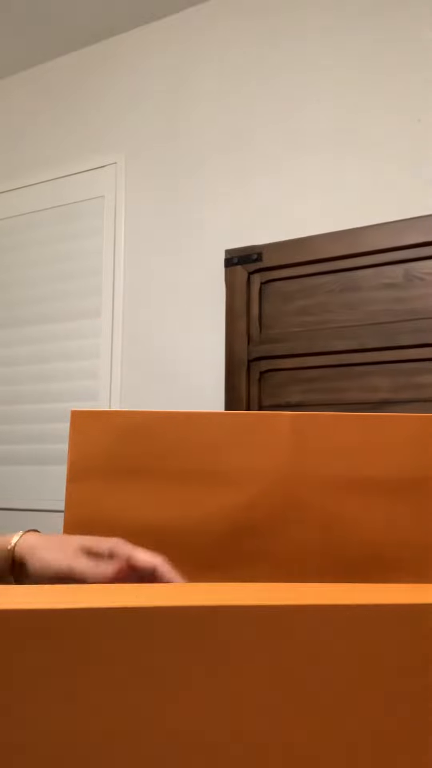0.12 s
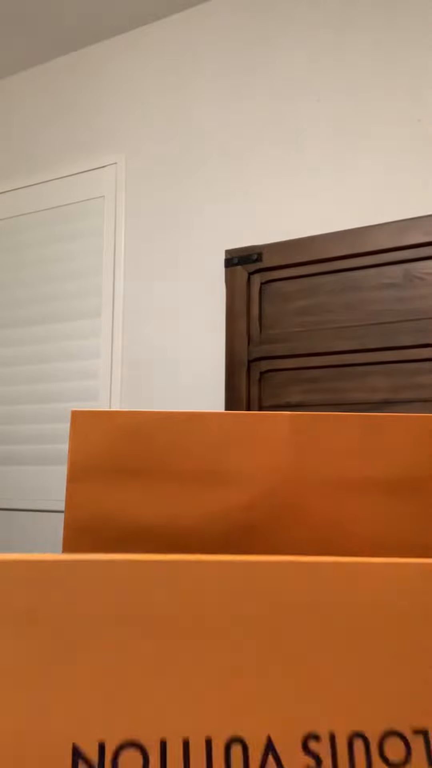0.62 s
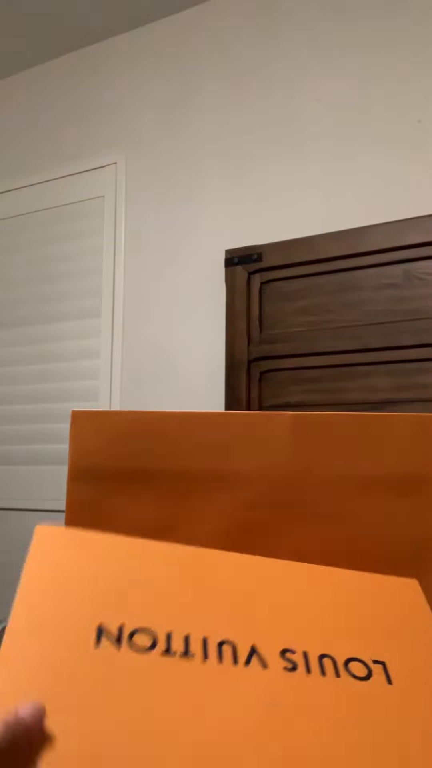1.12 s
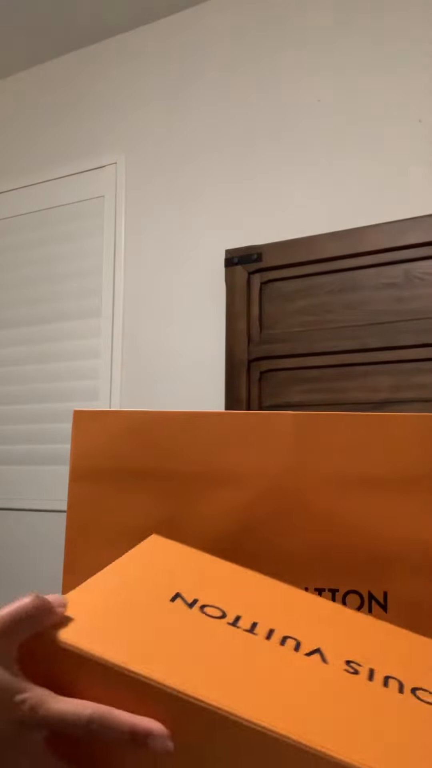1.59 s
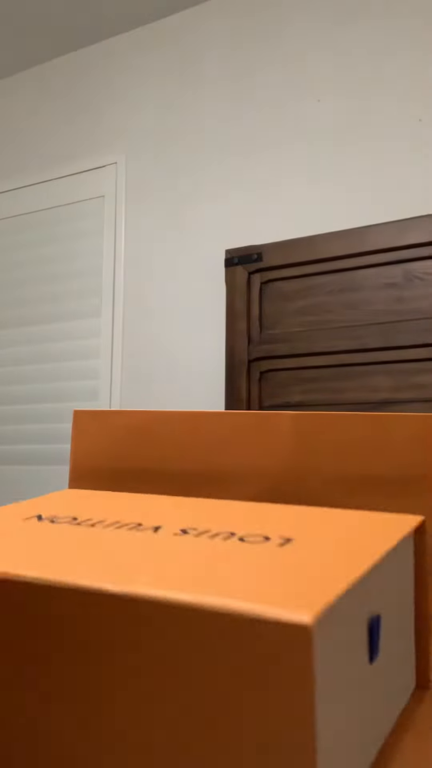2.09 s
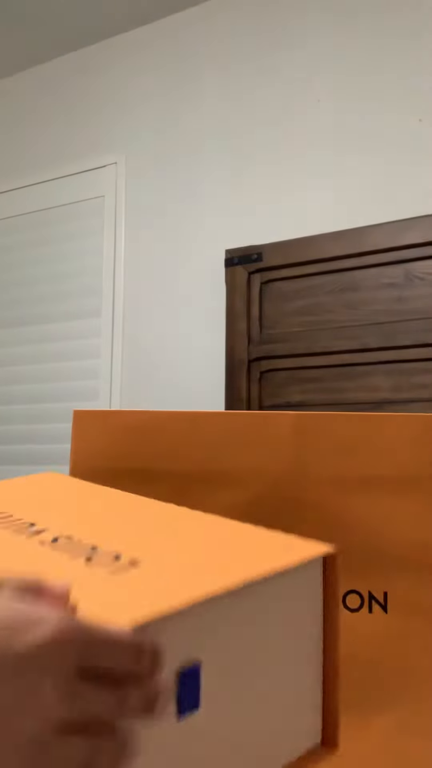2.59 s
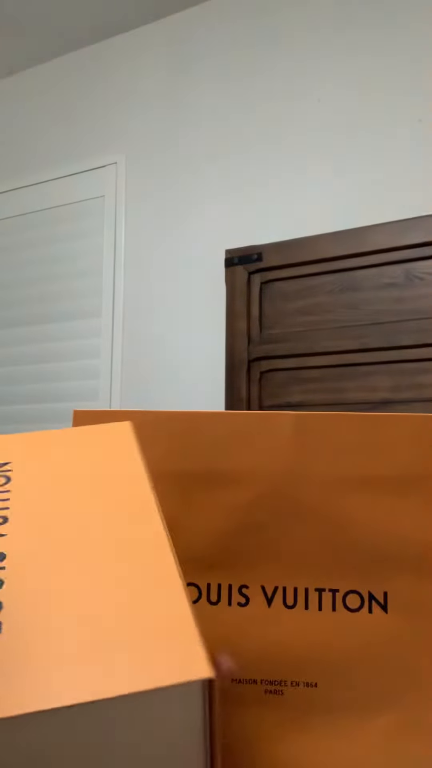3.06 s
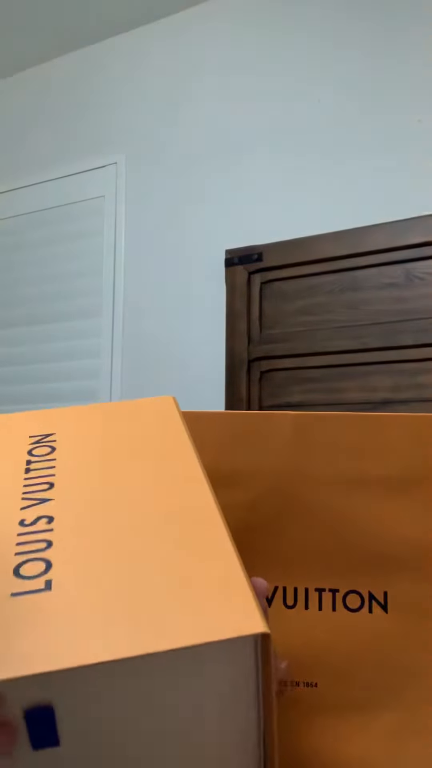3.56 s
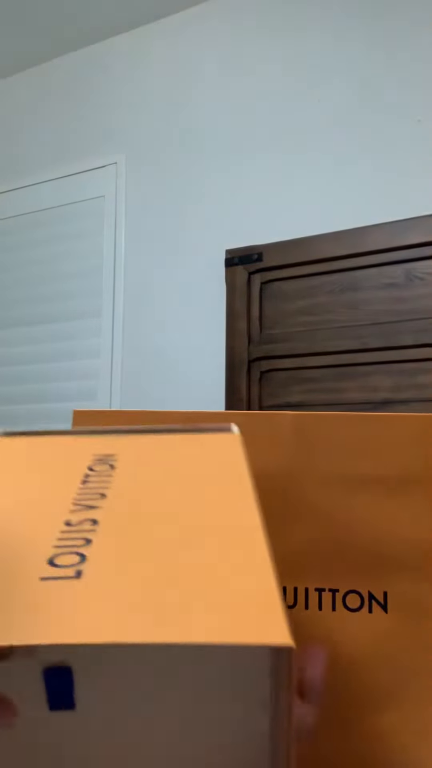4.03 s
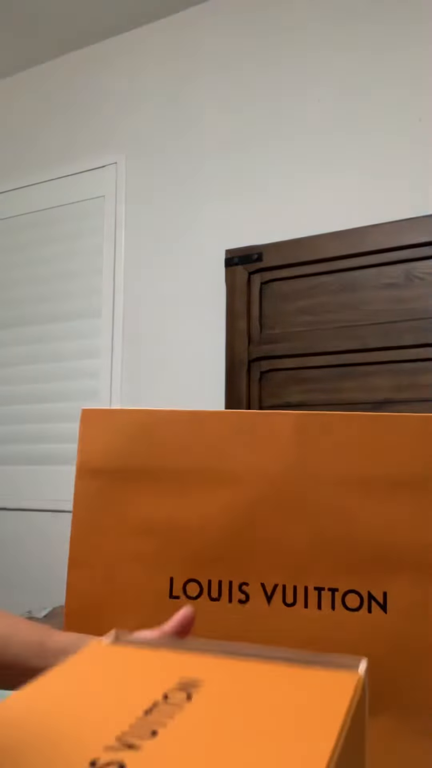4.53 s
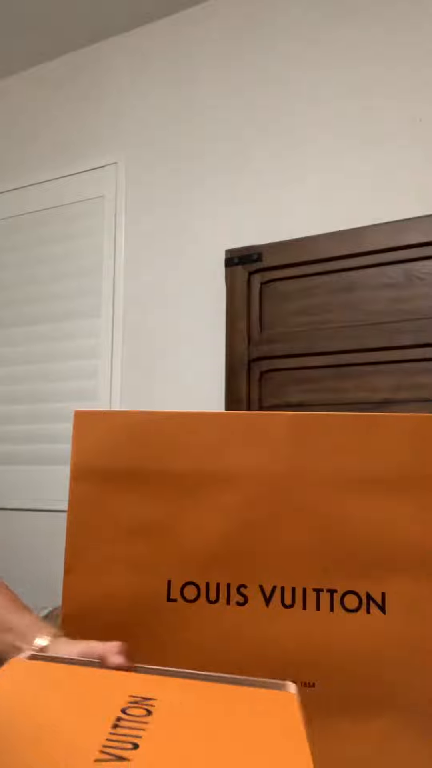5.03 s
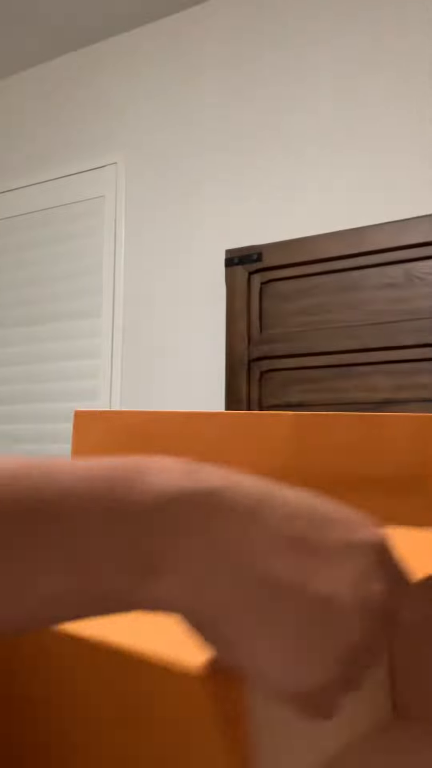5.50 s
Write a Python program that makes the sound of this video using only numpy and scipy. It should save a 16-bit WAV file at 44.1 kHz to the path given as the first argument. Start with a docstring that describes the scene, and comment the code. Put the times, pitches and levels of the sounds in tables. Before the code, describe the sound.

Hands turn a stiff, coated cardboard box near the microphone, with one strong scraping bump early, then scattered knocks, finger hiss and a busy rustling finish.

```python
"""Cardboard box in two hands

A hollow cardboard box is turned over close to a phone in a quiet room. Fingers hiss over the coated
paper as dense stick-slip; edges scrape and creak as coarser slips that ring the walls. Knocks excite
decaying modes of hollow and walls, palms make it boom, taps and snaps click, a bracelet tinks once.
The phone's two ports hear the treble a fixed moment apart, the lower range with a drifting lag."""
import sys
import numpy as np
from scipy import signal
from scipy.fft import rfft, irfft
from scipy.io import wavfile
from scipy.ndimage import uniform_filter1d, map_coordinates

SR = 44100
rng = np.random.default_rng(int(sys.argv[2]) if len(sys.argv) > 2 else 0)


def wav_record(signal):
    """Record a signal, one row per channel, as 16-bit PCM in the file named by sys.argv[1]."""
    frames = np.transpose(np.atleast_2d(signal))
    bounded = np.clip(frames, -1, 1)
    # unit amplitude maps onto the largest positive 16-bit level
    quanta = np.round(bounded * 32767).astype(np.int16)
    wavfile.write(sys.argv[1], SR, quanta)


def volts(x):
    """Linear amplitude factor 10**(x/20) for a level x in dB, scalar or array-like."""
    e = np.asarray(x, float) / 20
    return 10 ** e


N = 248825
T = np.arange(N) / SR
TREBLE_LAG = 5  # samples by which the left port hears the treble later


def unit(x):
    """Normalisation to unit rms."""
    return x / np.sqrt(np.mean(x ** 2))


def peak(x, level_db):
    """Normalisation of the largest excursion to a peak level in dB."""
    return x * volts(level_db) / np.abs(x).max()


def colour(x, points):
    """Spectral shaping: filter by a (Hz, dB) curve that falls away beyond its ends; rms 1."""
    hz, db = np.transpose(points)
    log_hz = np.log(np.arange(1, N // 2 + 2) * SR / N)
    below = np.maximum(np.log(hz[0]) - log_hz, 0)
    above = np.maximum(log_hz - np.log(hz[-1]), 0)
    gain_db = np.interp(log_hz, np.log(hz), db) - 20 * (below + above)
    return unit(irfft(rfft(x) * volts(gain_db), N))


def walk(rate):
    """Random modulation: levels drawn rate times a second and slewed between; spread near 1."""
    hold = int(SR / rate)
    steps = np.repeat(rng.standard_normal(N // hold + 1), hold)
    return unit(uniform_filter1d(steps, hold)[:N])


def slips(rate, spread_db):
    """Stick-slip friction: about rate tiny releases a second, most small and a few large."""
    chance, sign, size = rng.random((3, N))
    heights = volts(-spread_db * np.log(1 - .95 * size))
    return unit((chance < rate / SR) * np.sign(sign - .5) * heights)


def patchy(x, patchy_db, rate, octaves):
    """Patchy noise: overlapping bands, octaves apart, swell and sink independently at random."""
    octave = np.log2(np.arange(1, N // 2 + 2) * SR / N)
    spectrum = rfft(x)
    total = np.zeros(N)
    for centre in np.arange(7, 14.5, octaves):
        band = irfft(spectrum * np.clip(1 - np.abs(octave - centre) / octaves, 0, 1), N)
        total += band * volts(patchy_db * walk(rate))
    return unit(total)


def gesture(start, end, first_db, last_db, rise, fall):
    """Exponential envelopes, a row per gesture: rise and fall in dB/s around a course linear in dB."""
    start, end, first_db, last_db = (np.reshape(c, (-1, 1)) for c in (start, end, first_db, last_db))
    along = np.clip((T - start) / np.maximum(end - start, 1 / SR), 0, 1)
    edges = rise * np.maximum(start - T, 0) + fall * np.maximum(T - end, 0)
    return volts(first_db + (last_db - first_db) * along - edges)


def ring(modes, seconds):
    """Modal superposition: a sum of exponentially decaying sines (Hz, dB, t60 s)."""
    t = np.arange(int(seconds * SR)) / SR
    decay = -np.log(1000) * t
    return sum(volts(db) * np.sin(2 * np.pi * hz * t) * np.exp(decay / t60) for hz, db, t60 in modes)


def detuned_walls(level_scale=1, ring_scale=1):
    """Boundary loading: the grip retunes each wall mode at random, by 6 % rms."""
    detune = 1 + .06 * rng.standard_normal(len(WALL_MODES))
    return [(hz * d, db * level_scale, t60 * ring_scale) for (hz, db, t60), d in zip(WALL_MODES, detune)]


def add(out, sound, start_s):
    """Linear superposition of a sound from its starting time."""
    i = int(start_s * SR)
    out[i:i + len(sound)] += sound[:N - i]


def lagged(x, lag):
    """Time difference between two ports: left and right, the left later by lag samples."""
    i = np.arange(N)
    return np.array([map_coordinates(x, [i - lag / 2], order=3), map_coordinates(x, [i + lag / 2], order=3)])


# spectrum of the room air: hz [Hz], level_db [relative dB]
ROOM_SPECTRUM = [(35, -6.5), (80, -3), (400, -26), (2500, -42), (9000, -43)]


def room():
    """Stationary noise: faint steady air, partly unlike at the two ports above the bass."""
    common_db = -68
    mid = colour(rng.standard_normal(N), ROOM_SPECTRUM)
    side = colour(rng.standard_normal(N), ROOM_SPECTRUM)
    side = signal.sosfilt(signal.butter(1, 900, "high", fs=SR, output="sos"), side)
    return volts(common_db) * (lagged(mid, TREBLE_LAG) + 2.7 * side * np.array([[1], [-1]]))


# modes of the box walls: hz [Hz], level_db [relative dB], t60_s [s]
WALL_MODES = [(470, -1, .045), (575, -1, .04), (700, -1, .04), (830, -3, .035), (1020, -6, .03),
              (1260, -6, .03), (1500, -11, .025), (1750, -12, .022), (2000, -14, .02), (2600, -20, .015)]
# slides of the board against the grip:
# start_s [s], end_s [s], scrape_db [dB], creak_db [dB], change_db [dB along the slide]
SLIDES = [(0.072, 0.108, -71, -64.5, -5.5), (0.302, 0.558, -64, -61, -9.5),
          (0.624, 0.692, -68.5, -70, 16.5), (0.824, 0.971, -39, -36, -18.5),
          (1.043, 1.155, -60, -57.5, 4.5), (1.229, 1.62, -63.5, -59.5, -10), (1.706, 1.835, -59, -52.5, 1),
          (1.842, 2.05, -68, -63, -4.5), (2.156, 2.196, -86, -57.5, 0), (2.53, 2.63, -77, -55, -4),
          (2.627, 2.812, -69, -68, 7.5), (2.853, 2.958, -58.5, -54, -6), (2.985, 3.384, -68, -62.5, 3),
          (3.48, 3.624, -59.5, -59, 5.5), (3.66, 3.814, -45.5, -58.5, 4.5), (3.857, 3.933, -58.5, -52, 0.5),
          (3.96, 4.21, -71, -81.5, 12.5), (4.225, 4.37, -45.5, -41.5, -9), (4.417, 4.672, -52.5, -47.5, 1),
          (4.758, 4.997, -64.5, -66, 0.5), (5.125, 5.168, -48.5, -50, -10.5), (5.191, 5.34, -59, -57.5, 1),
          (5.356, 5.637, -52, -58, 3.5)]
# spectra of edge scrape, bright rasp and wall creak: hz [Hz], level_db [relative dB]
SCRAPE_SPECTRUM = [(300, -2.5), (650, 9.5), (1300, -3.5), (2200, -9.5), (4000, -12.5)]
RASP_SPECTRUM = [(800, -15), (1500, 9), (3200, -23.5)]
CREAK_SPECTRUM = [(80, -26), (160, 1.5), (280, 7.5), (450, -13.5), (900, -18)]


def sliding():
    """Stick-slip excitation of a plate: edges and creases slip coarsely and ring the walls."""
    start, end, scrape_db, creak_db, change_db = np.transpose(SLIDES)
    slide = gesture(start, end, 0 * change_db, change_db, rise=795, fall=256.5)
    judder = walk(45)  # the board catches and lets go, shaking scrape and creak together
    walls = ring(WALL_MODES, .1)

    grain = patchy(slips(2500, 2.8), patchy_db=3, rate=13, octaves=.3)
    scrape_ring = unit(signal.fftconvolve(grain, walls)[:N])
    scrape = colour(grain, SCRAPE_SPECTRUM) + volts(-24) * scrape_ring
    scrape = scrape * (volts(scrape_db) @ slide) * volts(2.5 * judder)

    # a slide that scrapes more than it creaks is brighter, by 0.87 dB per dB
    rasp_db = scrape_db - 14 + 0.87 * (scrape_db - creak_db)
    rasp = colour(grain, RASP_SPECTRUM) * (volts(rasp_db) @ slide)

    # creases give way in separate small jerks that tick through the walls
    jerks = slips(450, 2.0)
    creak_ring = unit(signal.fftconvolve(jerks, walls)[:N])
    creak = colour(jerks, CREAK_SPECTRUM) + volts(-16) * creak_ring
    creak = creak * (volts(creak_db) @ slide) * volts(0.74 * judder)
    return rasp + scrape + creak


# dry snaps of a nail or an edge letting go: start_s [s], level_db [peak dB]
SNAPS = [(0.094, -53), (1.555, -48.5), (1.632, -34), (2.502, -30), (2.521, -32.5), (4.394, -32),
         (5.1191, -24.5)]


def snaps():
    """Impulsive release: noise clicks about a millisecond long with a faint papery tail."""
    out = np.zeros(N)
    t = np.arange(int(.04 * SR)) / SR
    band = signal.butter(1, [1200, 9000], "band", fs=SR, output="sos")
    for start_s, level_db in SNAPS:
        decay = np.exp(-t / 0.00084) + 0.2 * np.exp(-t / 0.006)
        click = signal.sosfilt(band, rng.standard_normal(len(t)) * decay)
        add(out, peak(click, level_db), start_s)
    return out


# knocks: start_s [s], level_db [hollow peak dB], pitch_hz [Hz, base of the hollow modes],
# wall_db [dB relative to the hollow], ring_s [s, base of the hollow t60 and wall chatter]
KNOCKS = [(0.282, -52, 88, -4.5, 0.025), (0.334, -45, 93.2, -2.5, 0.38), (0.427, -45, 83, -26, 0.19),
          (0.668, -51, 398, 10.5, 0.098), (0.689, -41.5, 245, 4.5, 0.09), (0.786, -46, 350, 8, 0.23),
          (0.81, -30, 428, 4.5, 0.035), (0.825, -26, 318.5, 0.5, 0.097), (0.838, -34.5, 293, 7, 0.1),
          (0.871, -33, 132, 13, 0.07), (1.041, -50, 169.3, -9, 0.49), (1.174, -42, 189, 2.5, 0.1),
          (1.673, -27, 217, -4, 0.053), (2.176, -46.5, 235.6, -2.5, 0.12),
          (2.504, -24.5, 176.5, -11.5, 0.066), (2.522, -25, 193, -12, 0.069), (2.854, -48, 142, 7.5, 0.071),
          (3.022, -45, 198, -32, 0.043), (3.042, -39.5, 188, -27, 0.052), (3.088, -49, 240, 0.5, 0.13),
          (3.18, -55.5, 214, 5, 0.28), (3.415, -39, 214, -37, 0.06), (3.533, -32, 234, -10, 0.073),
          (3.555, -35.5, 231, -5, 0.074), (4.232, -28, 220, 5.5, 0.14), (4.257, -29.5, 195, -0.5, 0.1),
          (4.33, -38, 363, -7.5, 0.1), (4.397, -31.5, 198.5, 11, 0.098), (4.419, -30, 72, -1.5, 0.087),
          (4.653, -42, 317, -2, 0.1), (5.121, -36.5, 311, 13.5, 0.074), (5.149, -45, 306, 12.5, 0.08),
          (5.161, -45.5, 400, 17, 0.056), (5.377, -42.5, 342, 6, 0.039), (5.568, -43.5, 297, 6, 0.14)]
# modes of the hollow: ratio [multiple of pitch_hz], level_db [relative dB], share [multiple of ring_s]
HOLLOW_MODES = [(0.403, -15.5, 1.08), (1.005, 6, 0.68), (1.301, -10, 1.38), (1.748, -13, 0.82)]


def knocks():
    """Modal response to impact: each blow pushes the hollow and rattles the walls."""
    out = np.zeros(N)
    seconds = .25
    t = np.arange(int(seconds * SR)) / SR
    for start_s, level_db, pitch_hz, wall_db, ring_s in KNOCKS:
        modes = [(pitch_hz * ratio, db, ring_s * share) for ratio, db, share in HOLLOW_MODES]
        # a soft contact: the hollow takes a few ms to speak
        hollow = ring(modes, seconds) * (1 - np.exp(-t / 0.0055))
        # a fleshy contact dulls the upper modes
        grit = uniform_filter1d(rng.standard_normal(len(t)), size=18)
        grit[:3] += 1.2  # the first touch gets an extra push
        # the board chatters, so the walls are struck by a burst rather than once
        burst = grit * np.exp(-t / (0.1 * ring_s))
        walls = signal.fftconvolve(ring(detuned_walls(), seconds), burst)[:len(t)]
        add(out, peak(hollow, level_db) + peak(walls, level_db + wall_db), start_s)
    return out


# finger strokes over the paper, full touch from start to end:
# start_s [s], end_s [s], first_db [hiss dB], last_db [hiss dB], sheen_db [dB relative to the hiss]
STROKES = [(0.342, 0.371, -60, -58, -5), (0.405, 0.714, -77.5, -58, -11), (0.775, 0.907, -65, -61, -5.5),
           (1.024, 1.096, -66, -73, -5.5), (1.134, 1.18, -57, -62, -1), (1.27, 1.473, -60.5, -67, -4),
           (1.663, 1.824, -52.5, -62, -41), (1.827, 2.055, -67, -60, 4), (2.212, 2.217, -54.5, -62, -9.5),
           (2.292, 2.45, -81.5, -72, -35.5), (2.55, 2.674, -71, -60.5, 2.5), (2.717, 3.026, -59, -59, 8.5),
           (3.102, 3.176, -58, -74.5, -5), (3.206, 3.349, -70.5, -67, 11), (3.491, 3.555, -56.5, -52, -0.5),
           (3.683, 3.846, -48.5, -41.5, -0.5), (3.948, 4.098, -66, -55, 5), (4.142, 4.324, -49, -62, -0.5),
           (4.403, 4.625, -54, -65, -3), (4.676, 4.924, -62, -60.5, 1), (4.954, 5.1, -65, -73.5, -26),
           (5.206, 5.32, -70, -69, -33), (5.402, 5.7, -43, -46, 0)]
# quick flicks of a fingertip: start_s [s], level_db [hiss dB]
FLICKS = [(0.687, -49), (2.516, -47), (5.154, -40)]
# spectra of the hiss and of its top sheen: hz [Hz], level_db [relative dB]
HISS_SPECTRUM = [(700, -3.5), (2000, 4), (3500, 11.5), (6500, 4), (9000, -6), (11500, -23.5)]
SHEEN_SPECTRUM = [(10000, 0), (12000, -12), (15500, 0)]


def fingers():
    """Dense stick-slip of skin on coated paper: a hiss whose top sheen varies with the touch."""
    start, end, first_db, last_db, sheen_db = np.transpose(STROKES)
    stroke = gesture(start, end, first_db, last_db, rise=306.5, fall=265)
    start, level_db = np.transpose(FLICKS)
    flick = gesture(start, start, level_db, level_db, rise=1192, fall=454).sum(axis=0)
    grain = patchy(slips(15000, 1.0), patchy_db=1.6, rate=16, octaves=.5)
    hiss = colour(grain, HISS_SPECTRUM) * (stroke.sum(axis=0) + flick)
    sheen = colour(grain, SHEEN_SPECTRUM) * (volts(sheen_db) @ stroke + volts(-8) * flick)
    return (hiss + sheen) * volts(1.7 * walk(40))


# shoves of a palm against the hollow: start_s [s, at the height of the boom], level_db [boom dB]
SHOVES = [(0.345, -41), (0.83, -32.5), (1.05, -51), (1.25, -50.5), (1.68, -52.5), (1.871, -52.5),
          (2.516, -39), (2.87, -49), (3.251, -54), (3.55, -53.5), (4.246, -36.5), (4.43, -38.5),
          (4.6, -51.5)]
# spectrum of the boom: hz [Hz], level_db [relative dB]
BOOM_SPECTRUM = [(36, -18), (50, -2.5), (80, -5.5), (120, -4.5)]


def shoves():
    """Low-frequency forcing of a cavity: the hollow booms under the grip as swelling bass noise."""
    start, level_db = np.transpose(SHOVES)
    shove = gesture(start, start, level_db, level_db, rise=1177, fall=162).sum(axis=0)
    return colour(rng.standard_normal(N), BOOM_SPECTRUM) * shove * volts(2.5 * walk(10))


# fingertip taps that tick through the walls only: start_s [s], level_db [peak dB]
TAPS = [(0.786, -40), (1.668, -29), (1.733, -43), (2.602, -50), (2.883, -41), (3.145, -50), (4.21, -32),
        (4.383, -36), (4.503, -35), (4.519, -35), (4.549, -36), (4.568, -32), (4.604, -35), (4.625, -35),
        (5.243, -43)]


def taps():
    """Damped impact: one hard contact rings the walls, shortened by the fingers."""
    out = np.zeros(N)
    for start_s, level_db in TAPS:
        # halving the mode levels in dB evens them out
        tick = ring(detuned_walls(level_scale=.5, ring_scale=.8), .05)
        add(out, peak(tick, level_db), start_s)
    return out


# modes of the bracelet: hz [Hz], level_db [initial peak dB], t60_s [s]
BRACELET_MODES = [(2688, -78, 5.8), (7064, -66.5, 1.2)]


def bracelet():
    """Lightly damped metal modes: one tink, stilled by the knock that follows."""
    out = np.zeros(N)
    add(out, ring(BRACELET_MODES, .325), 2.177)
    return out


# where the lower range of the box is heard from: time_s [s], lag [samples, left later]
BEARING = [(0, 11), (2.5, -5.5), (3.9, -4.5), (4.2, 5.5), (5.64, 4.5)]


def at_ports(box, bright):
    """Time-difference localisation: only the lower range keeps its bearing, all treble one lag."""
    low = signal.sosfiltfilt(signal.butter(3, 3600, fs=SR, output="sos"), box)
    bearing = np.interp(T, *np.transpose(BEARING))
    return lagged(low, bearing) + lagged(box - low + bright, TREBLE_LAG)


def echo(x, t60):
    """Diffuse reflection: a short return from nearby walls, unlike in the two channels, weak in the bass."""
    t = np.arange(int(.3 * SR)) / SR
    tail = rng.standard_normal((2, len(t))) * np.exp(-np.log(1000) * t / t60)
    tail = signal.sosfilt(signal.butter(2, [480, 2800], "band", fs=SR, output="sos"), tail)
    tail = tail / np.sqrt(np.sum(tail ** 2) / 2)
    return signal.fftconvolve(x[None], tail, axes=1)[:, :N]


def thinned(x):
    """Treble gaps: above 3 kHz the sum or difference of the two channels falls silent in the bands where it is
    weak."""
    hz = np.arange(N + 1) * SR / (2 * N)
    turn = np.pi * hz * TREBLE_LAG / SR  # half the phase difference between the ports

    def part(weight, gain):
        # steep gate, half open where the gain that the lag leaves is -10 dB
        gate = gain ** 10 / (gain ** 10 + volts(10 * -10))
        keep = np.where(hz > 3000, gate, 1)
        return irfft(rfft(x[0] + weight * x[1], 2 * N) * keep)[:N] / 2

    mid = part(1, np.cos(turn))
    side = part(-1.01, np.sin(turn))
    return np.array([mid + side, mid - side])


def scene():
    """Superposition of direct sound, echo and room air; snaps are added after the stereo gating."""
    box = sliding() + shoves() + knocks() + taps()
    near = at_ports(box, fingers() + bracelet())
    return thinned(near + volts(-13) * echo(box, 0.11) + room()) + lagged(snaps(), TREBLE_LAG)


def roll_off(x):
    """The treble ends steeply here."""
    return signal.sosfilt(signal.butter(12, 16680, fs=SR, output="sos"), x)


def record(dry):
    """Band limiting: the phone trims the deepest bass and the top."""
    x = signal.sosfilt(signal.butter(3, 42, "high", fs=SR, output="sos"), dry)
    x = signal.sosfilt(signal.ellip(12, .3, 70, 15720, fs=SR, output="sos"), x)
    return roll_off(x)


dry = scene()
out = record(dry)
wav_record(out)
```